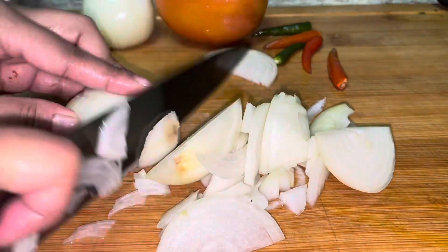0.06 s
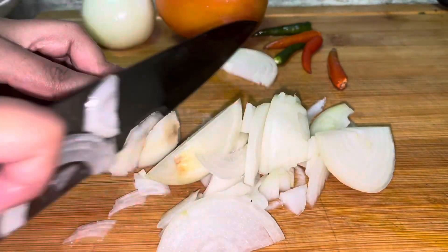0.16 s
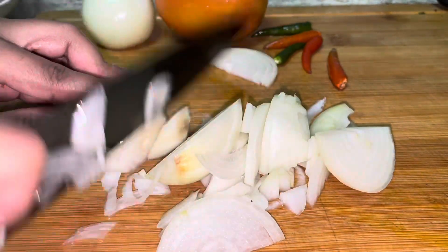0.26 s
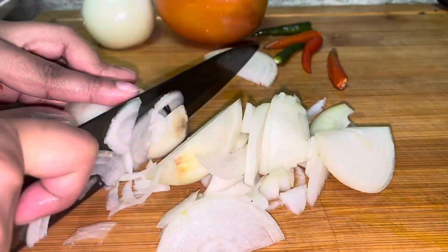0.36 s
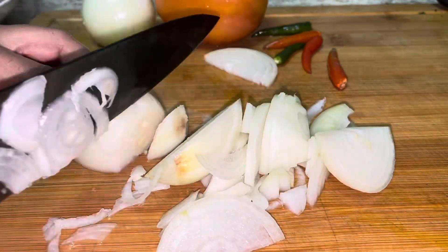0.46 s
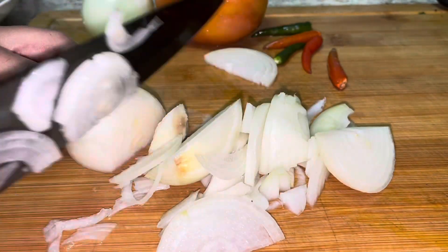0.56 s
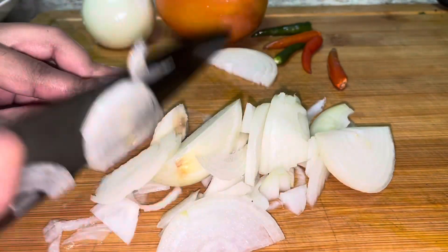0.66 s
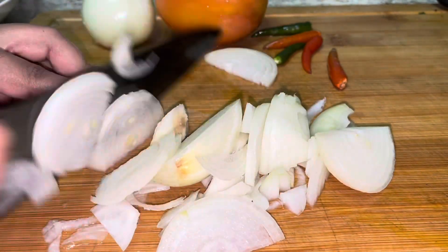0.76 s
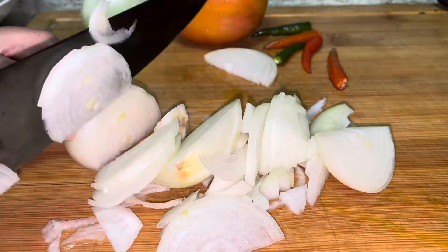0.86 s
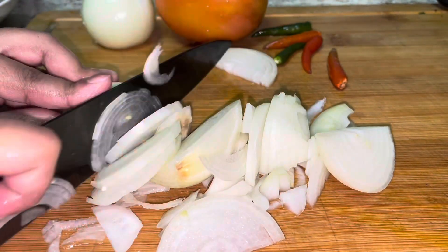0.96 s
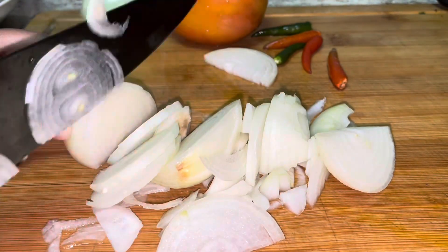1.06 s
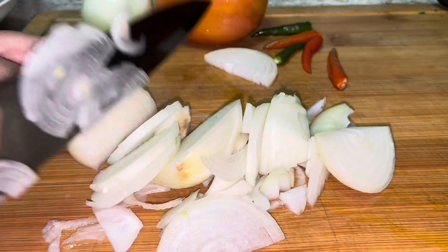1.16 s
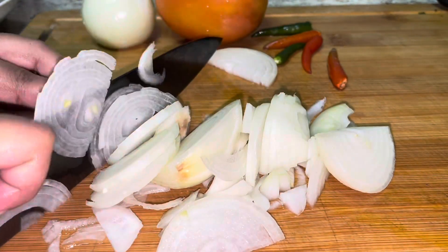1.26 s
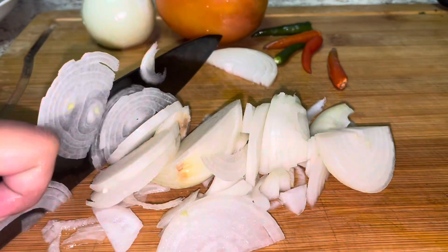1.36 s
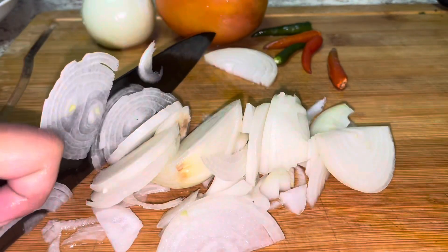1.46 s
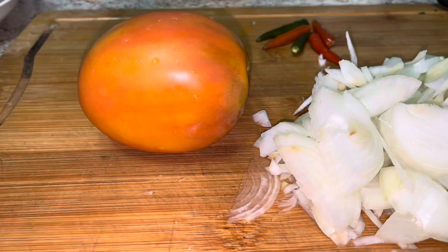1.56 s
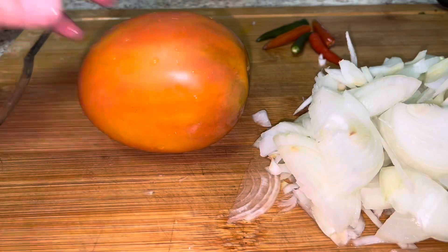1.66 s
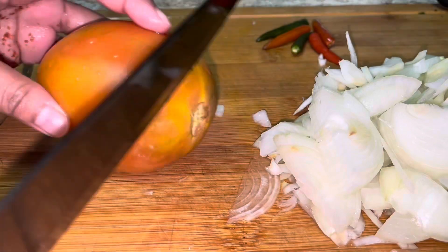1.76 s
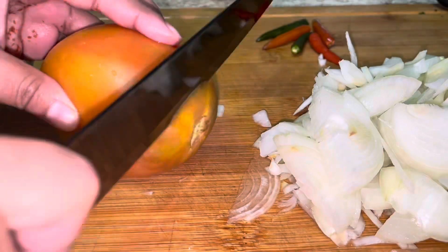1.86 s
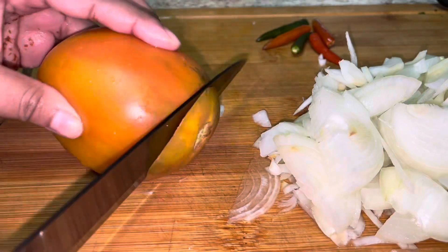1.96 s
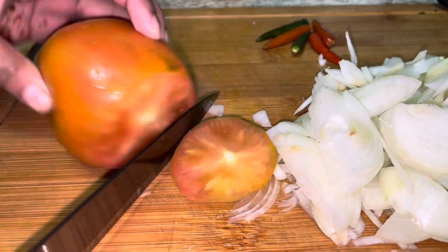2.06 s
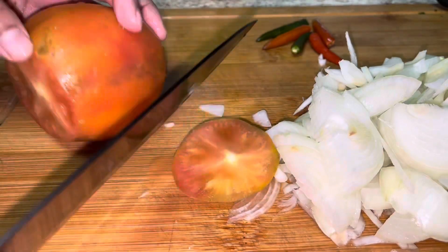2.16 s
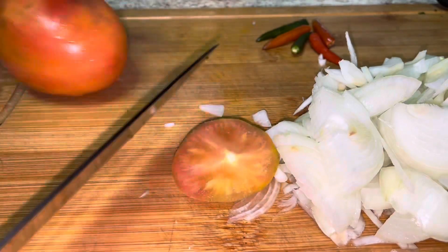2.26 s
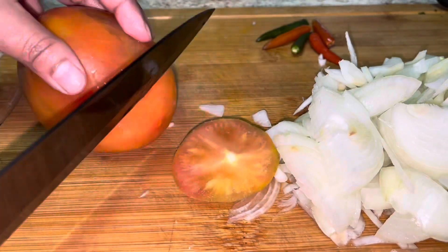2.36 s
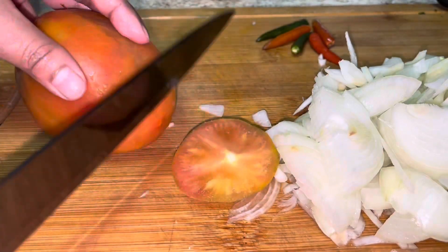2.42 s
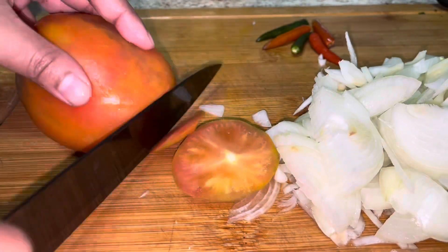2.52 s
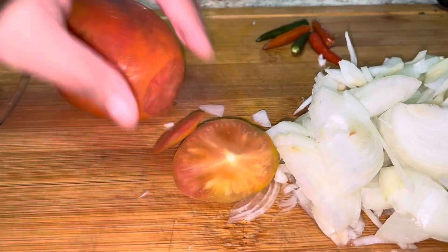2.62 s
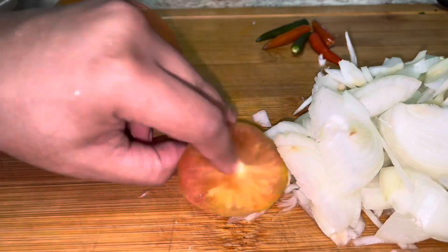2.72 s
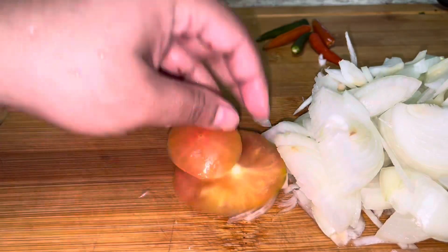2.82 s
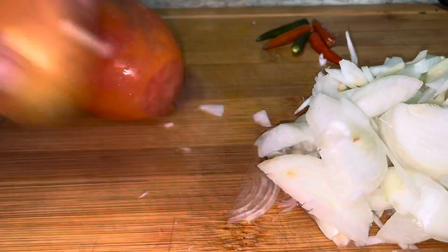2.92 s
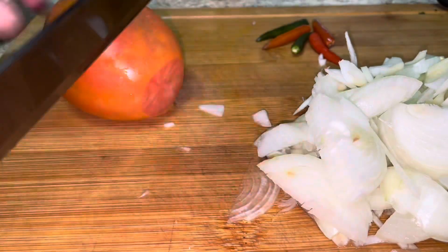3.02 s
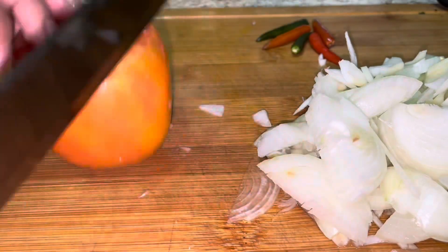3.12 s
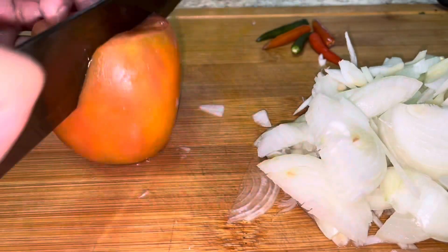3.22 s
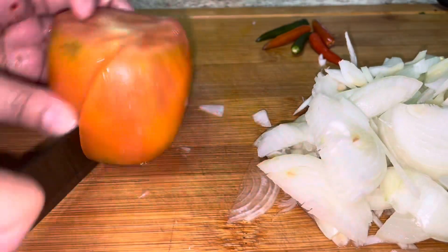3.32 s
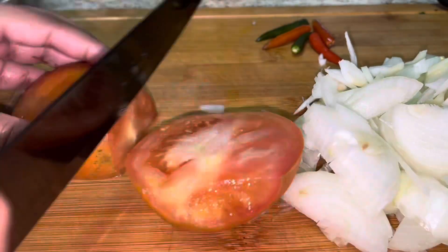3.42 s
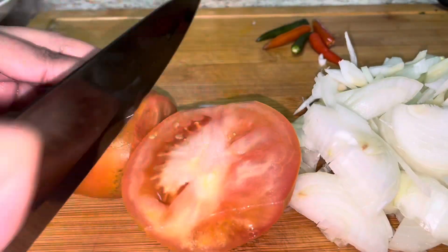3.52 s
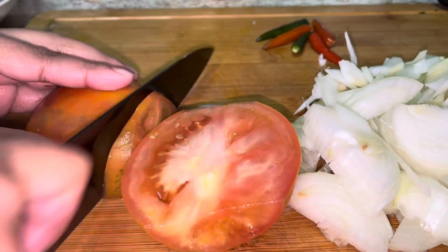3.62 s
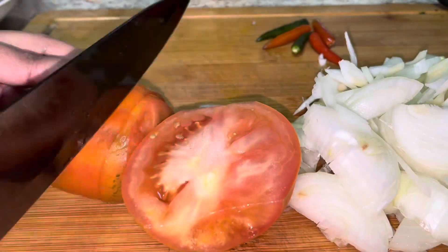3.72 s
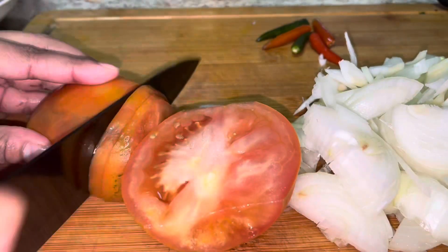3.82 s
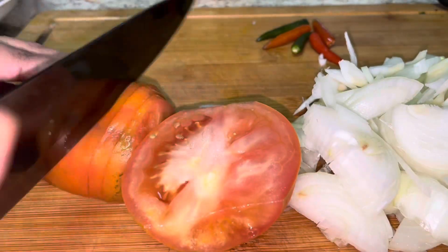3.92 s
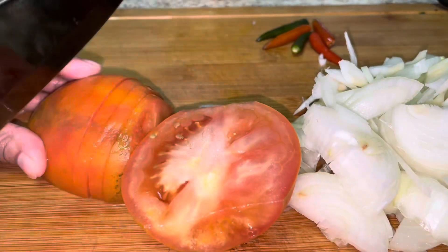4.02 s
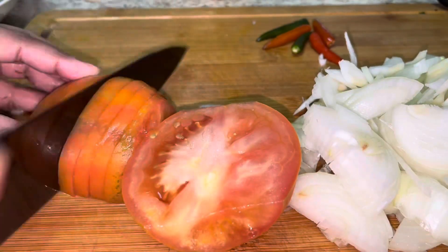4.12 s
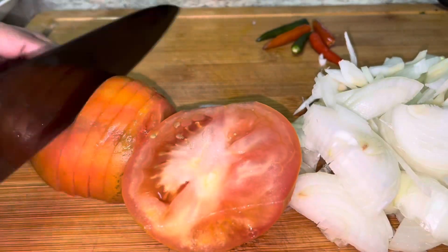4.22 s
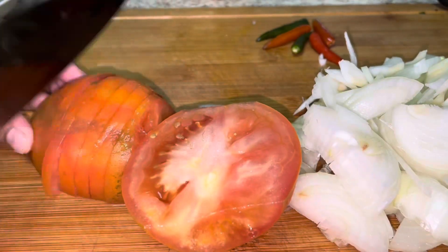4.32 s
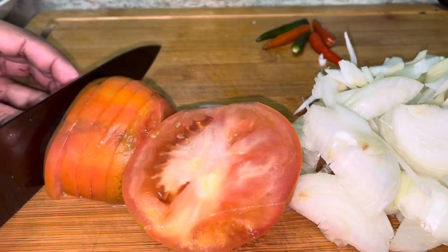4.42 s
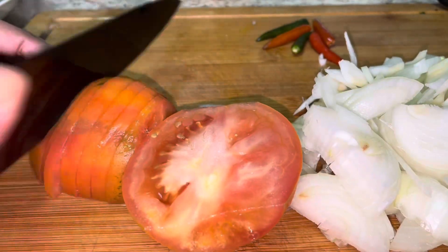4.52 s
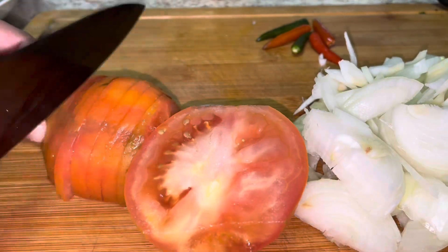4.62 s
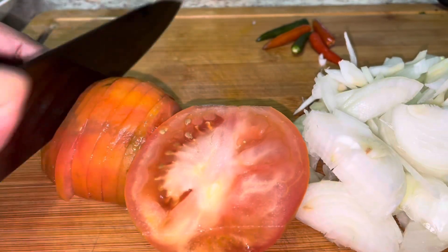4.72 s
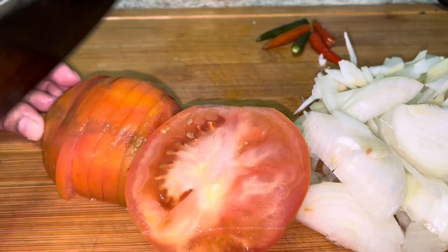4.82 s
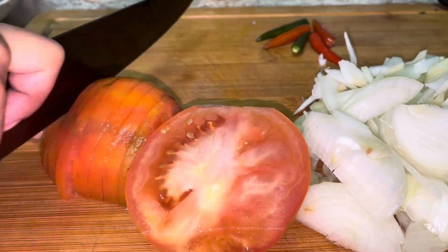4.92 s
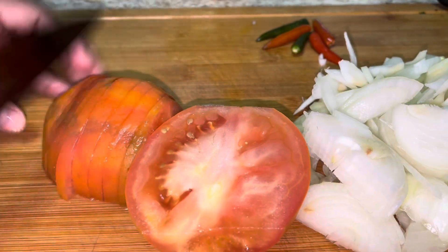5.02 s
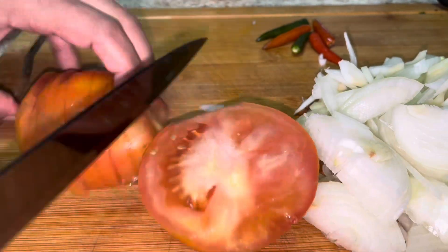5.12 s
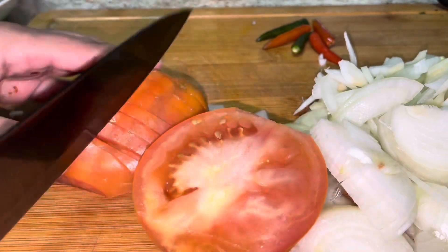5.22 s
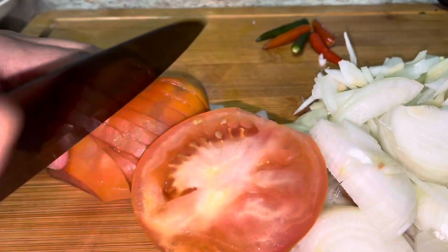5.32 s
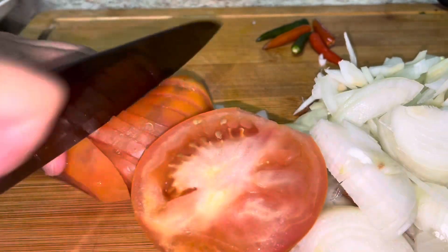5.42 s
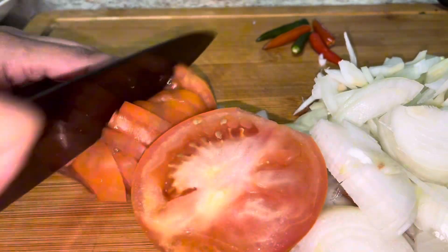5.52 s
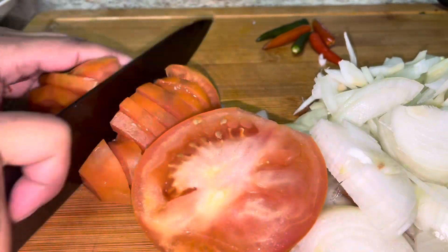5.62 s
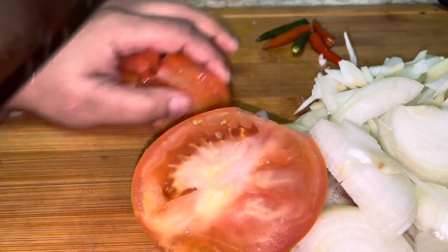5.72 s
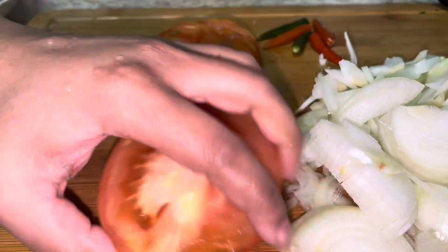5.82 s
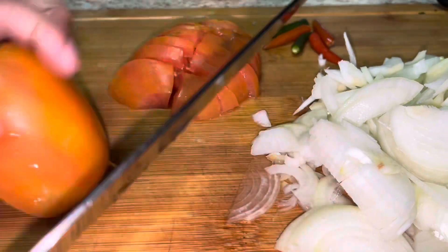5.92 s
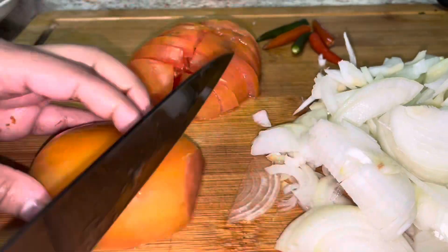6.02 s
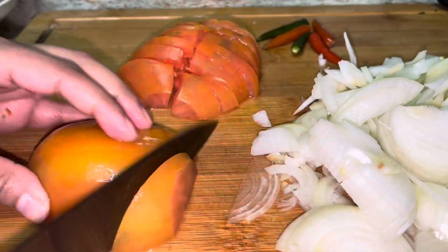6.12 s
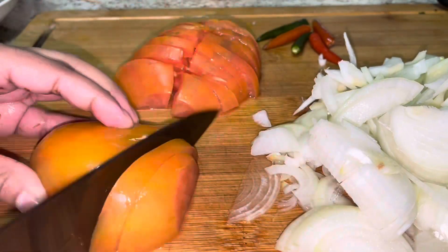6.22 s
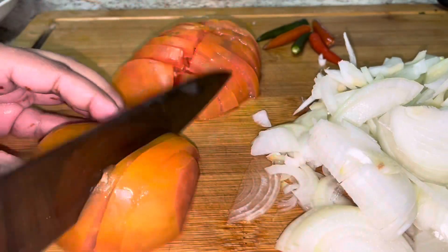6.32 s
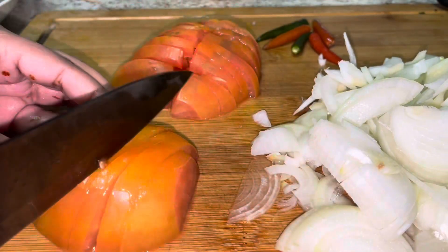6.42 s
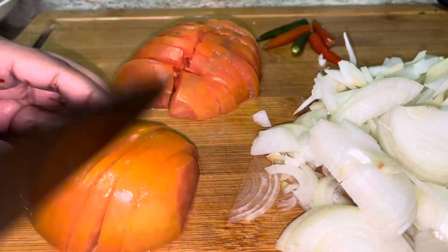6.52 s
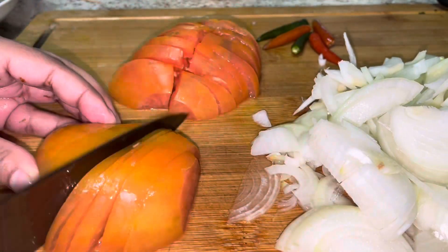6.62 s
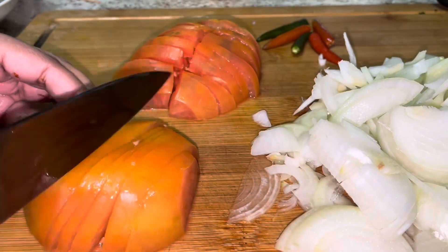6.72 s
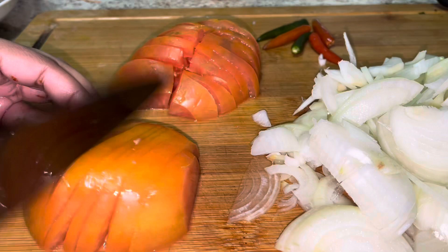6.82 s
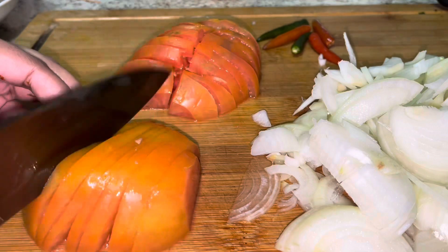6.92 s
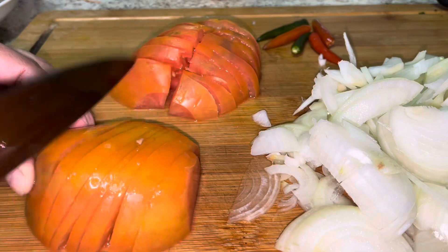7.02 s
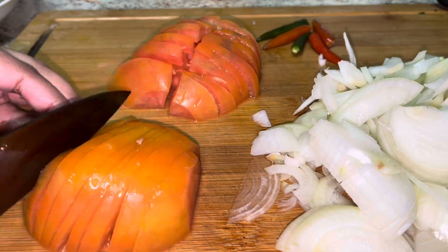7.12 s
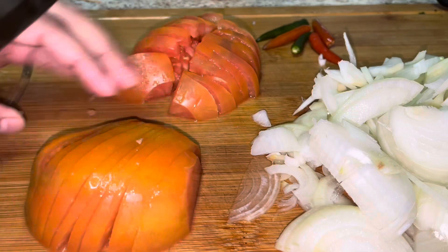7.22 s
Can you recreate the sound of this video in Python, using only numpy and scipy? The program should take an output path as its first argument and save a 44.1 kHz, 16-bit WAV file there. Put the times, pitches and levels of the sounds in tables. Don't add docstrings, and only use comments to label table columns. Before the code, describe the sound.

A knife slices crisp onion in quick wet crunches and woody knocks, then cuts tomato more softly and wetly on the same board.

```python
import sys
import numpy as np
from scipy import signal
from scipy.fft import rfft, irfft, next_fast_len
from scipy.io import wavfile

SR = 44100
rng = np.random.default_rng(int(sys.argv[2]) if len(sys.argv) > 2 else 0)


def unload_wav(signal):
    wavfile.write(
        sys.argv[1],
        SR,
        np.round(np.clip(np.atleast_2d(signal).T, -1, 1) * 32767).astype(np.int16),
    )


def volts_from_decibels(level):
    exponent = np.asarray(level, float) / 20
    return 10 ** exponent


N = 320607
SIZE = next_fast_len(N)
TIME_S = np.arange(N) / SR

SILENCE_S = (1.456, 1.472)
# time in seconds, peak in dB, loudest board mode in Hz, landing time in ms.
KNOCKS = [(0.0185, -16.5, 1270, 5.1), (0.208, -26.5, 1030, 9.5), (0.501, -20.5, 910, 6.9),
          (0.621, -15.5, 604, 4.7), (0.768, -13, 610, 6.1), (0.891, -29, 884, 2.5), (1.098, -38, 814, 17),
          (1.2355, -28, 920, 7.2), (2.0, -35.5, 610, 2.5), (2.524, -18, 1030, 2.9),
          (3.106, -57.5, 510, 3.9), (3.284, -20, 930, 1.3), (3.6238, -18, 850, 1.54),
          (3.966, -22.5, 840, 2.2), (4.26, -23, 930, 3.7), (4.398, -28, 790, 4.2), (4.5455, -20, 1650, 4.1),
          (4.7305, -16.5, 1850, 3.4), (4.9685, -19, 885, 2.66), (5.567, -21.5, 870, 0.88),
          (5.962, -37, 510, 2.9), (6.075, -19, 830, 3.8), (6.2135, -19, 1180, 5.2),
          (6.3415, -20.5, 1320, 3.2), (6.486, -13, 1210, 3.2), (6.612, -25, 1290, 5.7),
          (6.777, -13.5, 910, 3), (6.935, -26.5, 1110, 3.7), (7.145, -29.5, 1150, 5.2)]
# frequency in Hz, level in dB, t60 in seconds.
BOARD_MODES = [(175.6, -24, 0.053), (327.2, -21, 0.062), (619, -17, 0.043), (791.7, -1, 0.032),
               (928, -1.5, 0.03), (1160, -4.5, 0.03), (1441, 4.5, 0.017), (1704, -0.5, 0.021),
               (2110, -15.5, 0.003), (2444, -6, 0.024)]
# frequency in Hz, density in dB per Hz.
TOMATO_SPECTRUM = [(530, -29), (900, 6.5), (1350, -4.5), (1900, -7.5), (4300, 1.5), (5900, -6), (8760, -1),
                   (12300, -1.5), (16000, -11)]


def rms_one(x):
    return x / np.sqrt(np.mean(x ** 2) + 1e-20)


def at_hz(points):
    hz = np.maximum(np.arange(SIZE // 2 + 1) * SR / SIZE, 1)
    points_hz, values = np.array(points).T
    return np.interp(np.log(hz), np.log(np.maximum(points_hz, 1)), values)


def drift(rate_hz):
    r = np.exp(-2 * np.pi * rate_hz / SR)
    return rms_one(signal.lfilter([1], [1, -2 * r, r * r], rng.standard_normal(N + SR))[SR:])


def noises():
    return rng.standard_normal((3, N))


def grains(per_s, spread_db):
    sizes_db = spread_db * np.minimum(rng.exponential(1, (3, N)), 4)
    sizes = volts_from_decibels(sizes_db) * rng.choice([-1, 1], (3, N))
    return rms_one(sizes * (rng.random((3, N)) < per_s / SR))


def pair(three, spectrum=((1, 0), (2, 0)), share=1):
    # frequency in Hz, left-right likeness 0..1.
    likeness = [(60, .9), (250, .92), (400, 0.58), (1000, 0.33), (4000, 0.17), (8500, 0.68), (14000, 0.66)]
    alike = np.clip(share * at_hz(likeness), 0, 1)
    lines = rfft(three, SIZE)
    mixed = np.sqrt(alike) * lines[0] + np.sqrt(1 - alike) * lines[1:]
    return rms_one(irfft(volts_from_decibels(at_hz(spectrum)) * mixed, SIZE)[:, :N])


def ring(clicks, hz, t60_s):
    r, w = volts_from_decibels(-60 / (t60_s * SR)), 2 * np.pi * hz / SR
    return signal.lfilter([0, np.sin(w)], [1, -2 * r * np.cos(w), r * r], clicks + 1e-18)


def soft_contact(clicks):
    return signal.lfilter([.16], [1, -1.2, .36], clicks + 1e-18)


def voiced_db(s, hz):
    # deep modes in dB, upper modes in dB, surface in dB.
    voicing = [(1, 1.5, 0.5), (0.5, 3.5, 4.5), (-4.5, -3, -3.5), (1.5, 2.5, -3), (5, 2, 4.5), (7, -2, 2.5),
               (-5.5, 2.5, 3.5), (4.5, -5.5, -7), (6, -14, -7), (2, 1.5, -0.5), (6.5, -7.5, -0.5),
               (-5.5, 1, -1), (3.5, 3, -3), (-6.5, -3.5, -5), (1, 1.5, -1), (-0.5, -4.5, 0.5),
               (-3.5, 2.5, -2.5), (-11.5, 2, 11), (4.5, 7.5, 4.5), (-5.5, -4.5, -6), (9, 2.5, 10),
               (6.5, 2, -17), (-1, 5.5, -5), (0.5, -6, -10.5), (3.5, 3.5, 0), (-5, -5, -10), (7, 11, 9.5),
               (-1, -5, -6), (5, -0.5, -8)]
    deep_hz, upper_hz, surface_hz = 700, 1400, 2200
    if deep_hz < hz < upper_hz:
        return 0
    family = (hz > upper_hz) + (hz > surface_hz)
    return np.interp(s, [knock[0] for knock in KNOCKS], np.transpose(voicing)[family])


def hush():
    # time in seconds, level in dB.
    hush_levels = [(0, -78.5), (1.251, -83), (1.38, -87.5), (1.78, -87), (2.2, -83.5), (3.001, -81),
                   (5.702, -82), (6.701, -87.5), (7.27, -77.5)]
    # frequency in Hz, density in dB per Hz.
    air_spectrum = [(180, -27.5), (300, -9.5), (600, -14.5), (2000, -22.5), (5900, -28), (8500, -25.5),
                    (12800, -23), (14200, -43.5)]
    s, db = np.transpose(hush_levels)
    level = volts_from_decibels(np.interp(TIME_S, s, db) + 2.2 * drift(12.5))
    return level * pair(noises(), air_spectrum, share=0.3)


def rumble(shake):
    # time in seconds, level in dB.
    hand_levels = [
        [(0.0, -71), (0.678, -64), (1.154, -71), (1.3, -73), (1.45, -91)],
        [(1.82, -72.5), (1.99, -62.5), (2.2, -80), (3.18, -76.5), (3.61, -86), (4.35, -75.5), (5.17, -82),
         (5.8, -81), (6.11, -69), (6.66, -63.5), (7.05, -84), (7.27, -73)],
    ]
    # time in seconds, level in dB.
    shuffle = [(1.474, -70), (1.528, -66), (1.58, -65), (1.651, -70), (1.701, -67), (1.79, -74)]
    # frequency in Hz, density in dB per Hz.
    hand_spectrum = [(20, -24.5), (45, -3.5), (120, 0.5), (260, -8), (380, -19.5), (600, -28.5),
                     (1100, -48)]
    # frequency in Hz, density in dB per Hz.
    shake_spectrum = [(20, -30), (40, -11), (124, -0.5), (320, -14.5), (600, -21), (1100, -43), (2000, -77)]
    # time in seconds, peak in dB, frequency in Hz, t60 in seconds.
    set_down = (2.999, -22.5, 84, .065)
    s, db = np.transpose([*hand_levels[0], *shuffle, *hand_levels[1]])
    hands = volts_from_decibels(np.interp(TIME_S, s, db) + 1.2 + 4.0 * drift(11)) * pair(noises(), hand_spectrum)
    shaken = shake * pair(noises(), shake_spectrum)
    drop_s, peak_db, hz, t60_s = set_down
    blow = signal.lfilter([.01], [1, -.99], (np.arange(N) == int(drop_s * SR)) + 1e-18)
    return hands + shaken + volts_from_decibels(peak_db) * ring(blow, hz, t60_s)


def bites():
    # time in seconds, hiss in dB, crunch in dB above it, fall in ms.
    onion_cuts = [(0, -46, -2.5, 14), (0.151, -45, -3.5, 62), (0.32, -37.5, -3.5, 31.6),
                  (0.371, -53, -0.5, 14), (0.445, -58, -18, 7.9), (0.479, -40, -3, 31.3),
                  (0.609, -32.5, 1.5, 22.1), (0.701, -57, -8.5, 36), (0.758, -32, -1, 18.7),
                  (0.879, -34.5, -3, 19.1), (0.947, -54.5, -6, 31), (1.001, -57.5, 2.5, 6.1),
                  (1.089, -34.5, -1.5, 19.4), (1.218, -36.5, -1.5, 19.2)]
    # seconds, dB, dB, ms.
    first_half_cuts = [(2.475, -49.5, -6, 22), (3.007, -46.5, 1.5, 12), (3.198, -51.5, -5.5, 21),
                       (3.247, -45.5, -4, 26), (3.582, -49.5, -1.5, 17), (3.613, -49, 3.5, 19),
                       (3.749, -54, -5.5, 8.6), (3.779, -47.5, 0.5, 21), (3.815, -51.5, 0, 13),
                       (3.928, -48, -0.5, 36.6), (4.079, -45, 2, 29), (4.224, -45, 2, 34),
                       (4.365, -46.5, 0.5, 31.6), (4.512, -49, -2.5, 41), (4.679, -56, -13, 16),
                       (4.731, -38.5, 7, 9.5), (4.881, -60, -7, 39), (4.957, -46, 0.5, 23.5)]
    # seconds, dB, dB, ms.
    second_half_cuts = [(5.953, -48, -7.5, 11.7), (6.057, -46.5, -4.5, 30.3), (6.187, -44, -3, 15.5),
                        (6.313, -49.5, -11, 25.3), (6.442, -50.5, -11, 31), (6.613, -43.5, 3, 17.2),
                        (6.734, -58, -1.5, 17), (6.766, -45, 1, 22.2), (6.887, -58.5, -0.5, 32),
                        (6.952, -53.5, 6.5, 13), (7.058, -66, -6, 17), (7.137, -48.5, -1, 23)]
    # time in seconds, hiss in dB, crunch in dB above it, rise in ms.
    landings = [(0.023, -39.5, 6, 6.5), (0.205, -34.5, 8.5, 4.9), (0.498, -33.5, 7, 7.6),
                (0.891, -32.5, -4.5, 1.4), (2.023, -54.5, -4, 9.5), (2.051, -55.5, -2, 14.5),
                (2.519, -39.5, 8.5, 10), (3.284, -51, 10, 20), (3.647, -57.5, 2, 6.1),
                (3.969, -51.5, 12, 9.8), (4.122, -53.5, 5, 36), (4.403, -49.5, 7, 23),
                (4.543, -53.5, 21.5, 15.2), (5.574, -50, 5.5, 32.4), (6.219, -44, 3, 12),
                (6.338, -47, 12, 21), (6.486, -48.5, 3.5, 34), (6.584, -56, -1.5, 17.5),
                (6.717, -62, 5.5, 12), (6.934, -46, -2.5, 11.3), (7.118, -62, -10, 31),
                (7.176, -55, 3.5, 18)]
    # time in seconds, hiss in dB, crunch in dB above it, half width in ms.
    brushes = [(0.05, -81.5, 15, 30), (0.088, -71.5, -16, 39), (0.566, -66.5, 1, 10),
               (0.835, -66.5, 0, 5.5), (1.031, -70.5, -9, 9.2), (1.16, -73.5, 10, 49),
               (1.293, -77.5, -19.5, 11.5), (2.19, -82.5, 10, 9.1), (2.32, -79.5, -11, 51),
               (2.376, -67.5, 1.5, 6.9), (2.4, -75.5, -21, 17), (2.549, -62, 4, 14),
               (2.574, -66.5, -2, 9.2), (2.658, -72, 5, 11), (2.749, -74, -5.5, 12),
               (2.887, -71.5, -12.5, 8.4), (3.157, -73, -14, 6), (3.317, -63.5, 3.5, 25),
               (3.378, -62.5, -10.5, 12.6), (3.452, -70.5, -11.5, 17), (3.524, -59, -11.5, 21),
               (4.289, -76.5, -5, 3.3), (4.623, -70.5, -15, 6.8), (5.152, -66, -22, 7),
               (5.137, -72.5, -1, 44), (5.234, -80, -22, 9.7), (5.595, -60.5, 0.5, 22.6),
               (5.709, -71, 0, 24), (6.515, -60, 7, 3.5), (7.202, -67, -12.5, 3.6), (1.715, -81, -10, 15),
               (2.084, -79, 4.5, 16), (2.289, -79, -1, 7.3), (2.43, -81, -15, 9.4), (2.675, -83.5, 2.5, 10),
               (2.775, -75, -11, 5.6), (5.734, -75, 6.5, 12), (5.685, -69.5, 2, 6.9), (5.9, -79, -0.5, 7),
               (6.02, -78, -9, 29), (6.13, -79, -17, 5.8), (6.251, -78, -15, 2.5)]
    # time in seconds, hiss in dB, crunch in dB above it.
    sawing = [(1.832, -58.5, -10.5), (1.863, -59, -8), (1.891, -57.5, -5), (1.926, -55, -5.5),
              (1.955, -50.5, -4.5), (1.99, -47, -3), (5.28, -70, -23), (5.313, -66, -18),
              (5.35, -64.5, -20), (5.386, -58, -8.5), (5.42, -60, -13), (5.452, -55.5, -13.5),
              (5.492, -57.5, -8.5), (5.528, -53, -5)]
    cuts = onion_cuts + first_half_cuts + second_half_cuts
    cut_rise_ms, landing_fall_ms, slip_rise_ms, slip_fall_ms = 11.5, 8.1, 11.5, 13.3
    rows = [(s, db, crunch, cut_rise_ms, fall) for s, db, crunch, fall in cuts]
    rows += [(s, db, crunch, rise, landing_fall_ms) for s, db, crunch, rise in landings]
    rows += [(s, db, crunch, width, width) for s, db, crunch, width in brushes]
    rows += [(*slip, slip_rise_ms, slip_fall_ms) for slip in sawing]
    return rows


def swell(s, rise_ms, fall_ms):
    shape = 1.61
    at = np.arange(max(int((s - .15) * SR), 0), min(int((s + .15) * SR), N))
    width_s = np.maximum(np.where(at < s * SR, rise_ms, fall_ms), 2) / 1000
    return at, np.exp(-2 * np.abs((at / SR - s) / width_s) ** shape)


def stroke_gains():
    # time in seconds, table shake in dB, half width in ms.
    bumps = [(0.591, -42.5, 8.9), (1.292, -57, 19.6), (1.995, -43, 9.9), (2.2, -70, 20), (2.28, -64, 11),
             (2.575, -53, 14), (2.665, -58, 18), (2.715, -68, 17), (2.06, -68, 12), (1.47, -69.5, 9.9),
             (1.915, -67, 12), (2.759, -56.5, 16), (3.105, -50, 16.6), (3.159, -74, 7), (3.384, -57, 14),
             (3.576, -50, 9), (3.71, -62.5, 7.5), (3.891, -55.5, 8.9), (4.045, -49.5, 8),
             (4.188, -59.5, 20), (4.331, -63, 5.2), (4.478, -58.5, 11), (4.551, -58, 6.6), (4.74, -47, 5.8),
             (5.89, -73, 20), (5.967, -43.5, 9.5), (6.009, -56.5, 6.7), (6.216, -42, 5.9), (6.555, -60, 11),
             (6.611, -42.5, 6.2), (6.932, -45, 8.9), (7.125, -49, 15)]
    power = np.zeros((4, N))
    for s, hiss_db, crunch_db, rise_ms, fall_ms in bites():
        at, shape = swell(s, rise_ms, fall_ms)
        bright_db = 1 - 0.63 * crunch_db
        shake_db = -5.5 + 0.15 * crunch_db
        above_db = np.array([[0], [bright_db], [crunch_db], [shake_db]])
        power[:, at] += volts_from_decibels(2 * (hiss_db + above_db)) * shape
    for s, shake_db, width_ms in bumps:
        at, shape = swell(s, width_ms, width_ms)
        power[-1, at] += volts_from_decibels(2 * shake_db) * shape
    return np.sqrt(power)


def tearing(gain, bright_gain):
    # frequency in Hz, density in dB per Hz.
    onion_spectrum = [(530, -26.5), (900, 3.5), (1360, -17.5), (2190, -13), (2450, -3), (4520, -4),
                      (5610, -10), (12400, -7.5), (16000, -17)]
    onion = pair(grains(per_s=11000, spread_db=4.5), onion_spectrum) * volts_from_decibels(1.9 * drift(150))
    tomato = pair(grains(per_s=7900, spread_db=1.5), TOMATO_SPECTRUM) * volts_from_decibels(2.0 * drift(140))
    cells = volts_from_decibels(-0.47) * np.where(TIME_S < SILENCE_S[0], onion, tomato)
    skin_hz = 8000
    low = signal.sosfiltfilt(signal.butter(2, skin_hz, fs=SR, output="sos"), cells)
    return gain * low + bright_gain * (cells - low)


def crunching(gain):
    lag_s = 0.0024
    jolts = pair(grains(per_s=2500, spread_db=3.5)) * volts_from_decibels(2.5 * drift(120)) * np.roll(gain, int(lag_s * SR))

    def voice(hz):
        s = np.arange(0, N, 64) / SR
        return np.repeat(volts_from_decibels(0.21 * voiced_db(s, hz) + np.zeros(len(s))), 64)[:N]

    board = np.zeros((2, N))
    for k, (hz, db, t60_s) in enumerate(BOARD_MODES):
        board += (-1) ** k * volts_from_decibels(0.31 * db) * voice(hz) * ring(jolts, hz, 0.61 * t60_s)
    surface = voice(2470) * ring(jolts, 2397, 0.0031)
    direct = ring(jolts, 3500, 0.0016)
    return volts_from_decibels(-18.0) * board + volts_from_decibels(-12.5) * surface + volts_from_decibels(-21.0) * direct


def knocks():
    # time in seconds,
    # peak in dB, loudest mode in Hz, landing in ms.
    further_knocks = [(0.01, -23, 873, 2.8), (0.0265, -21.5, 1000, 3.1), (0.031, -33.5, 1180, 2),
                      (0.2035, -22, 920, 2), (0.2116, -20, 1530, 1.9), (0.2187, -24, 1200, 1.1),
                      (0.6258, -22, 900, 2.5), (0.631, -28, 1300, 2.4), (1.227, -26.5, 891, 2.1),
                      (1.2439, -30.5, 878, 2.75), (4.5404, -23.5, 907, 1.86), (4.5497, -19, 1363, 4.5),
                      (4.734, -24, 1120, 2.7), (6.207, -20.5, 1120, 1.8), (6.221, -25.5, 1080, 2.4),
                      (6.332, -23.5, 1100, 2.4), (6.604, -31, 1180, 1.7), (6.6204, -35, 1010, 2),
                      (7.141, -30, 1098, 1.8)]
    # frequency in Hz, level in dB, t60 in seconds.
    long_modes = [(254, -38, 0.19), (316, -41, 0.17), (435, -40, 0.16), (635, -45, 0.13), (738, -45, 0.18),
                  (865, -49, 0.1), (990, -41, 0.075)]
    out = np.zeros((2, N))
    before = int(.03 * SR)
    t = np.arange(-before, int(.2 * SR)) / SR
    blows = KNOCKS + further_knocks
    shares = rng.standard_normal((len(blows), len(BOARD_MODES), 3))
    noise = rng.standard_normal((len(blows), 3, len(t)))
    firm = soft_contact(t == 0)
    for (s, peak_db, hz, landing_ms), share, rough in zip(blows, shares, noise):
        is_onion = s < SILENCE_S[0]
        surface_db, crack_db, thud_db = (-7, -45, -42.5) if is_onion else (-17, -64.5, -43)
        surface_voiced_db = voiced_db(s, 2400)

        landing = np.exp(-np.abs(t) * 1000 / max(landing_ms, .5) / np.where(t > 0, 1.8, 1))
        swarm = (rough[0] + 0.95 * rough[1:]) * landing * (rough[0, ::-1] > 1.3)
        touches = soft_contact((t == 0) + 0.19 * swarm)

        wood = volts_from_decibels(-3) * ring(touches, hz, .013)
        wood += volts_from_decibels(surface_db + surface_voiced_db) * ring(touches, 2400, 0.01)
        for (mode_hz, mode_db, t60_s), (both, *own) in zip(BOARD_MODES, share):
            own = np.array(own)
            near = abs(np.log(mode_hz / hz)) < .25
            sign = 1 if near else np.sign(both + .5 * own * (mode_hz > 400))
            mode_gain_db = voiced_db(s, mode_hz) + .5 * mode_db - 4.5 + 0.4 * both + 0.66 * own
            strength = sign * volts_from_decibels(mode_gain_db)
            wood += strength[:, None] * ring(touches, mode_hz, 0.59 * t60_s)

        cushion_hz = np.clip(4500 * volts_from_decibels(0.35 * surface_voiced_db), 1500, 9000)
        wood = signal.lfilter(*signal.butter(2, cushion_hz, fs=SR), wood)
        wood = wood / np.abs(wood).max(axis=1, keepdims=True) * 1.208

        loaded_db = -3 * (s > 5.8 or is_onion)
        for (mode_hz, mode_db, t60_s), chance in zip(long_modes, rough[1]):
            shifted_hz = mode_hz * (1 + 0.008 * rough[2, int(mode_hz)])
            wood += volts_from_decibels(mode_db + 2.3 * chance + loaded_db) * ring(firm, shifted_hz, t60_s)
        wood = signal.lfilter(*signal.butter(2, 134.7, "high", fs=SR), wood)

        crack = np.diff(rough[0] + .5 * rough[1:], prepend=0) * np.exp(-np.abs(t) / 0.00027)
        thud = np.diff(ring(ring(touches, 110, 0.02), 170, 0.021), prepend=0) * 0.062
        thud *= volts_from_decibels(thud_db + (peak_db + 21.5) / 2)
        blow = volts_from_decibels(peak_db) * wood + volts_from_decibels(crack_db) * crack + thud
        at = int((s + 0.001495) * SR) + np.arange(len(t)) - before
        inside = (at >= 0) & (at < N)
        out[:, at[inside]] += blow[:, inside]
    return out


def ticks():
    # time in seconds, peak in dB.
    tick_rows = [(1.15, -60), (1.175, -59), (1.183, -52), (1.002, -56), (1.031, -55), (1.808, -65),
                 (1.978, -42), (5.35, -47), (5.3855, -44), (5.4495, -53), (5.491, -52), (1.3344, -64),
                 (2.0269, -35.5), (2.189, -63), (2.377, -50.5), (0.0202, -20), (0.7692, -27), (1.696, -68),
                 (2.215, -65), (2.279, -64), (2.4157, -60.5), (2.557, -54), (2.813, -62), (2.891, -57),
                 (3.2543, -45), (3.7724, -48.5), (5.9575, -43), (5.9647, -36), (6.057, -42), (5.194, -61),
                 (3.89, -62), (4.0445, -72), (5.0859, -51), (5.6046, -44.5), (6.514, -61.5)]
    clicks = np.zeros(N)
    for s, peak_db in tick_rows:
        clicks[int(s * SR)] = volts_from_decibels(peak_db - 4.5)
    return signal.lfilter([1], [1, -.97], clicks + 1e-18) * pair(noises(), TOMATO_SPECTRUM)


def squelches():
    # time in seconds, peak in dB, frequency in Hz, length in seconds.
    juice = [
        (0.192, -42, 2800, 0.0046),
        (0.21, -21.5, 3000, 0.004),
        (0.475, -38, 4000, 0.0051),
        (1.09, -27.5, 2950, 0.017),
        (6.7218, -48.5, 4440, 0.015),
        (6.729, -35, 4390, 0.01),
        (6.885, -45.5, 4270, 0.0065),
        (7.056, -44.5, 4300, 0.0137),
    ]
    # time in seconds, peak in dB, frequency in Hz, length in seconds.
    rubs = [(1.919, -53, 4250, 0.01), (2.037, -46, 1270, 0.017), (2.184, -67, 2550, 0.0061),
            (2.304, -72.5, 4880, 0.029), (2.375, -51.5, 4990, 0.0042), (2.657, -76, 4610, 0.015),
            (5.691, -62, 1100, 0.025), (5.692, -59, 1710, 0.027), (5.693, -59, 2480, 0.026),
            (5.694, -59, 3730, 0.025), (5.695, -65.5, 5360, 0.026), (7.055, -54.5, 1830, 0.013)]
    out = np.zeros((2, N))
    wet = pair(grains(per_s=900, spread_db=4.5))
    for s, peak_db, hz, length_s in juice + rubs:
        at = slice(int((s - .05) * SR), int((s + 0.36) * SR))
        gap = signal.butter(3, [.83 * hz, 1.2 * hz], "band", fs=SR, output="sos")
        burst = np.exp(-((TIME_S[at] - s - length_s / 2) / length_s) ** 2)
        out[:, at] += volts_from_decibels(peak_db - 7.5) * burst * rms_one(signal.sosfilt(gap, wet[:, at]))
    return out


def scene():
    hiss, bright, crunch, shake = stroke_gains()
    food = tearing(hiss, bright) + crunching(crunch)
    return hush() + rumble(shake) + food + knocks() + ticks() + squelches()


def low_pass(x):
    return signal.sosfilt(signal.butter(12, 16460, fs=SR, output="sos"), x)


def record(dry):
    # frequency in Hz, left port's lead in radians.
    lead = [(0, 0), (340, 0.6), (1100, 0.9), (5080, 0.7), (5700, -0.4), (6720, -1.0), (7670, -2.9),
            (8350, -3.1), (9300, -3.4), (13100, -6.3), (16000, -6.3)]
    # frequency in Hz, left minus right in dB.
    tilt = [(60, -1.5), (180, -0.8), (300, 1.6), (550, 2.4), (1650, 2.8), (4970, 2.8), (15000, -1)]
    apart = volts_from_decibels(at_hz(tilt) / 2) * np.exp(.5j * at_hz(lead))
    ports = irfft(rfft(dry, SIZE) * [apart, 1 / apart], SIZE)[:, :N]
    ports = signal.sosfilt(signal.cheby2(14, 60, 16100, fs=SR, output="sos"), ports)
    ports = signal.sosfilt(signal.butter(2, 51, "high", fs=SR, output="sos"), ports)
    silent = (TIME_S > SILENCE_S[0]) & (TIME_S < SILENCE_S[1])
    return low_pass(ports * np.where(silent, .1, 1))


dry = scene()
out = record(dry)
unload_wav(out)
```